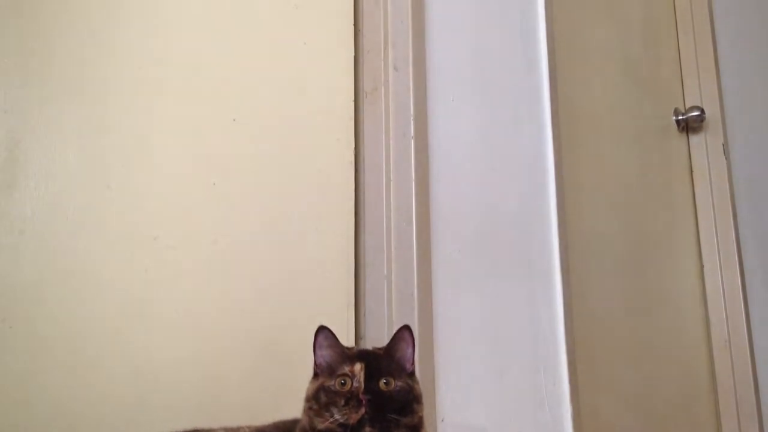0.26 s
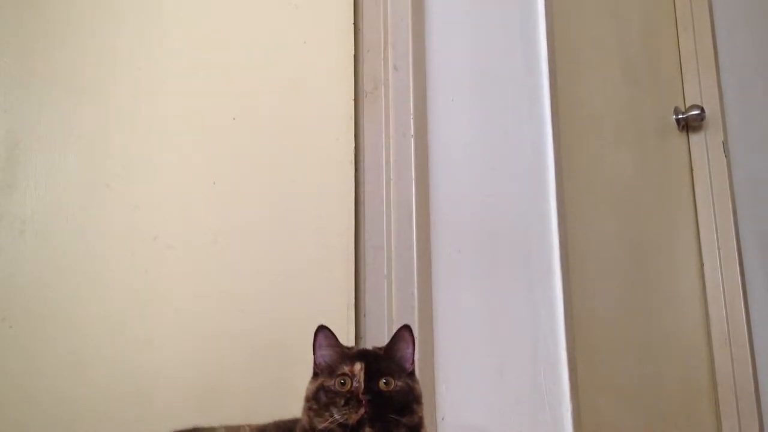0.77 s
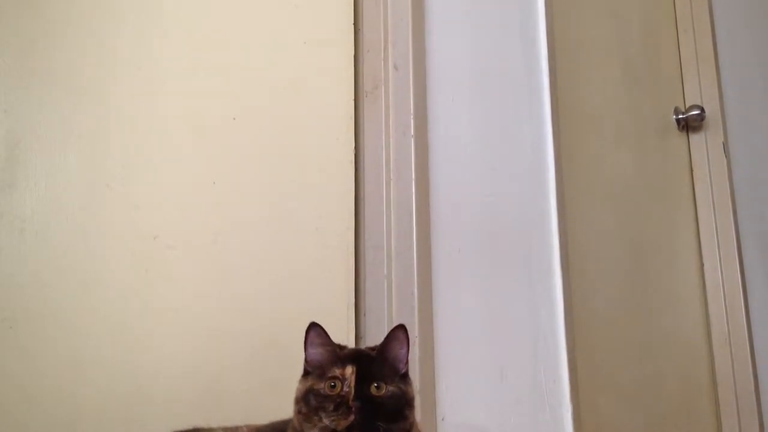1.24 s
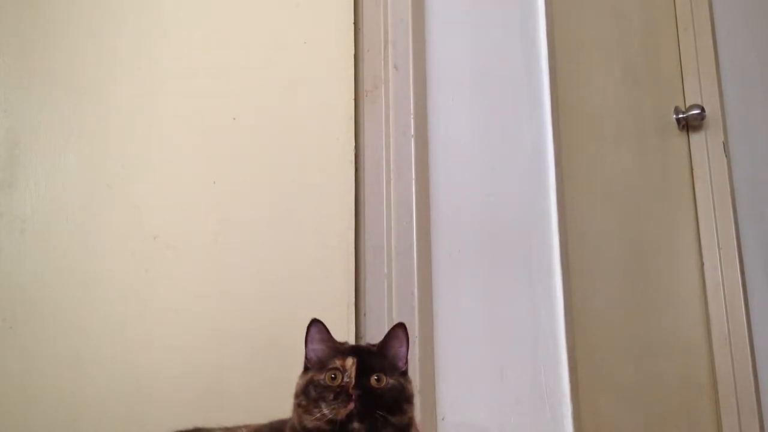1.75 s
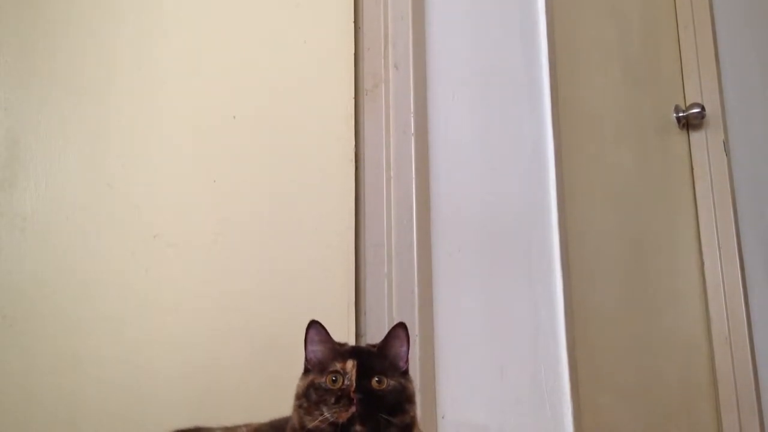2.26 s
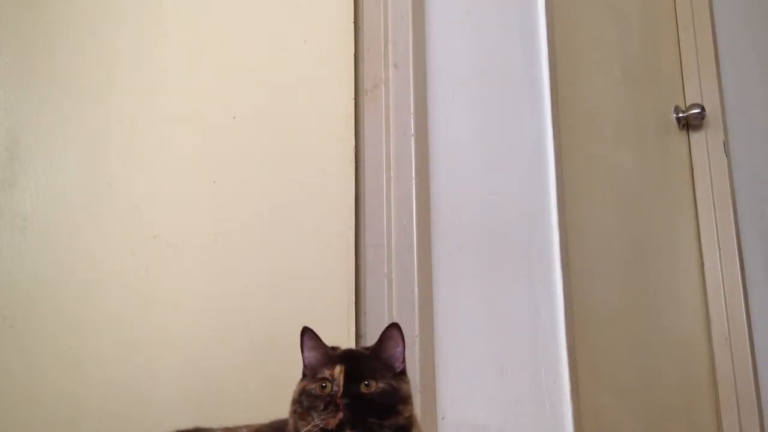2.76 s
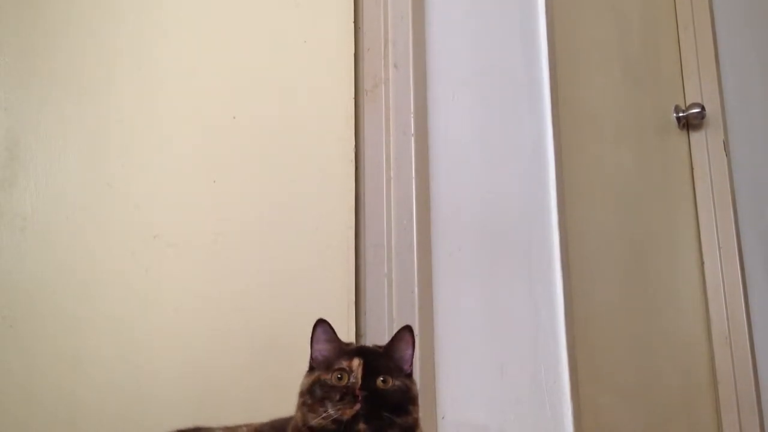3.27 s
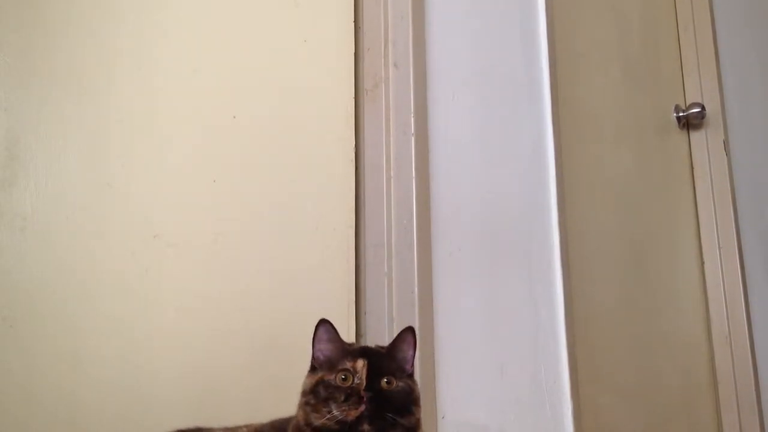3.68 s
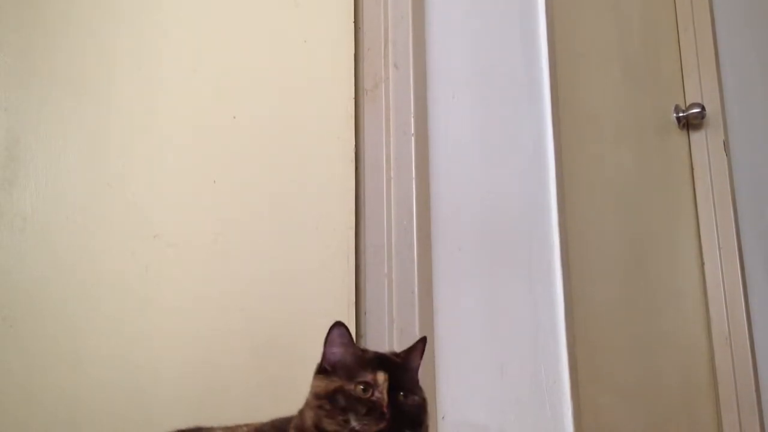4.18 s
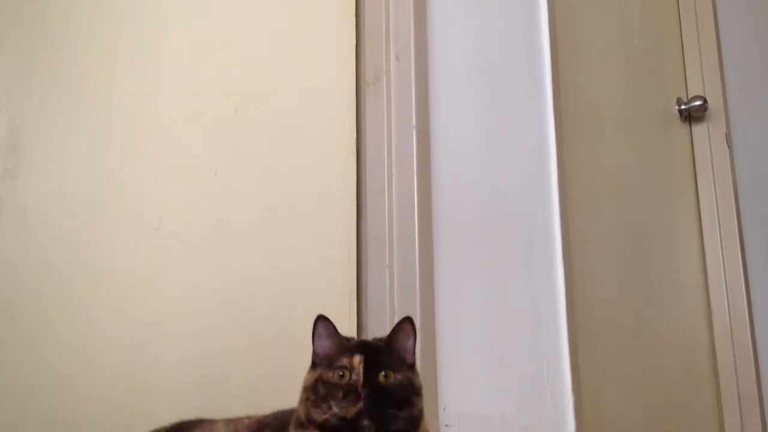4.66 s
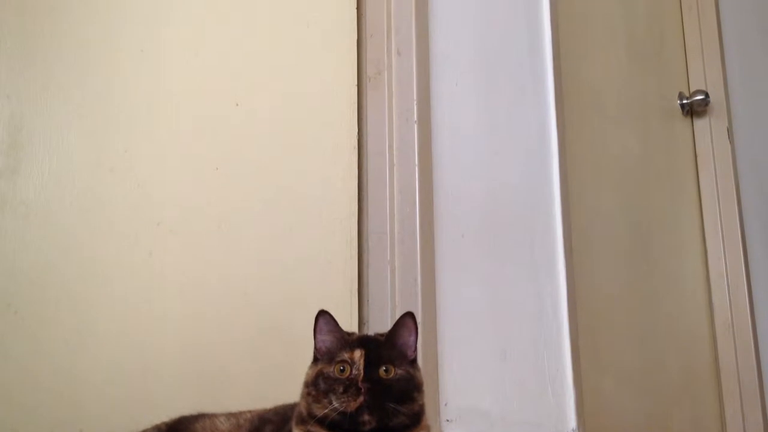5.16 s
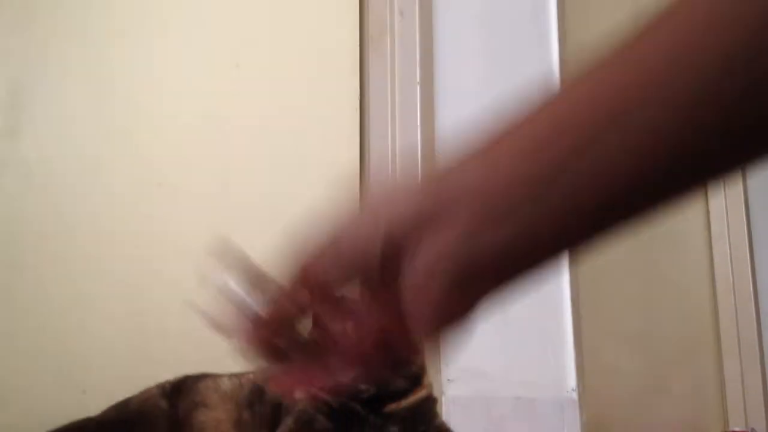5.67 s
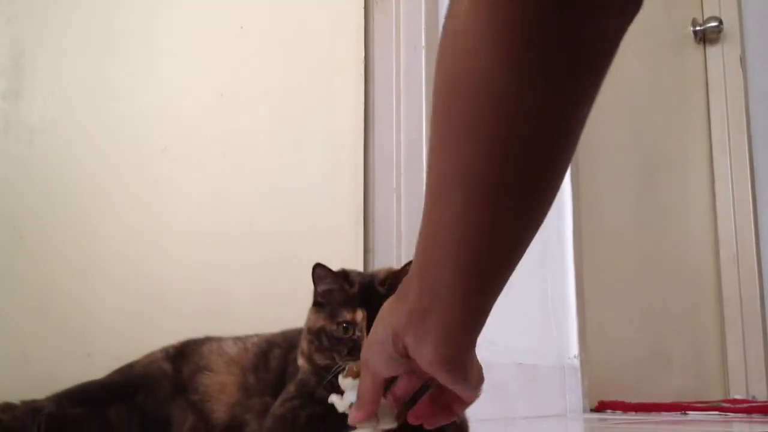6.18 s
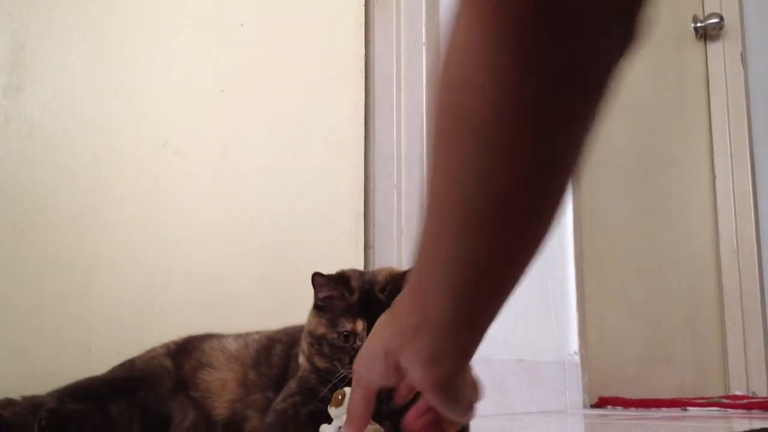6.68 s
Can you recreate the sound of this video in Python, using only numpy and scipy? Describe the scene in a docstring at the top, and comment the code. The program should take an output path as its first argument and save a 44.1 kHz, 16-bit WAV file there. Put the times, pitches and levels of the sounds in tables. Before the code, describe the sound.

Close to a mono microphone in a quiet, hard-walled room, fingers wind a small plastic clockwork toy. Nine ratcheting twists, some nearly joined, make sharp clicks over fine gear ticking, with short bright whirrs between most of them and little finger knocks. Let go at about five seconds, the motor whirrs loudly, grows duller, quieter and slower as it is set down, then speeds up again.

```python
"""A hard, quiet room, rumbling, humming and hissing faintly; a small plastic clockwork toy close to a mono microphone.
From the start it is wound by hand: each twist ticks the gears and snaps the pawl, made of short noise bursts.
Fingers knock and rub on the case; between twists they let go and the gears race, strikes and chatter in a case filter.
After the last twist the motor runs free, its colour passing from lifted to lowered, to the floor, to half tipped up.
Bare walls and floor answer the toy throughout with a short tail of decaying noise."""
import sys
import numpy as np
from scipy import signal
from scipy.fft import rfft, irfft
from scipy.io import wavfile

SR = 44100
rng = np.random.default_rng(int(sys.argv[2]) if len(sys.argv) > 2 else 0)


def generate_wav(signal):
    """Clip the signal to [-1, 1] and save it as 16-bit WAV at the path in sys.argv[1]."""
    frames = np.transpose(np.atleast_2d(signal))
    scaled = np.clip(frames, -1, 1) * 32767
    pcm = np.round(scaled).astype(np.int16)
    wavfile.write(sys.argv[1], SR, pcm)


N = 305613

# rumble of the room: (frequency [Hz], relative level [dB])
ROOM_RUMBLE = [(20, -48), (50, -40), (70, -19), (95, -9), (120, -9.5), (160, -0.5), (250, 2.5), (320, -3),
               (450, -7.5), (700, -9.5), (1000, -13.5), (1500, -20.5), (3000, -33)]
# hum of the room: (frequency [Hz], level [dB])
ROOM_HUM = [(146, -69.5), (232, -74), (340, -72.5), (383, -71)]
# hiss of the room: (frequency [Hz], relative level [dB])
ROOM_HISS = [(500, -1), (1200, 4.5), (2500, 5.5), (6000, -8), (15000, 12)]
# twists of the key: (start [s], end [s], gear ticking before trim [dB], ratchet teeth passing [1/s])
TWISTS = [(0, .31, -46.5, 22), (0.629, 0.816, -44.5, 70), (1.12, 1.28, -45, 65), (1.589, 1.745, -45, 58),
          (2.052, 2.252, -43.5, 56), (2.664, 2.951, -47.5, 36), (3.35, 3.612, -45.5, 37),
          (4.12, 4.58, -47.5, 30), (4.59, 4.72, -47, 25)]
# spectrum of the ticking gears: (frequency [Hz], relative level [dB])
TICK_SPECTRUM = [(150, -33), (700, -10), (1500, -15), (2800, -14.5), (4200, -8.5), (5500, -14), (6700, -7),
                 (7800, -7.5), (10000, -2), (11500, -4), (13000, -3.5), (15200, -1)]
# loudest pawl clicks: (time [s], snap level before trim [dB], dull body relative to the snap before trim [dB])
LOUD_CLICKS = [(0.0145, -36, -4.5), (.0461, -32, -6), (.105, -30.5, -13), (.138, -29.5, -5.5),
               (.162, -31, -9.5), (.1847, -35, -14), (0.1956, -33, -5), (0.2042, -26.5, -20),
               (.2201, -31, -7.5), (0.2311, -31, -2), (.244, -30, -16), (.258, -32.5, -3.5),
               (.271, -33, -16), (.299, -29, -14), (.649, -33.5, -6.5), (.7314, -30.5, -2),
               (.753, -30, -10), (.7649, -29.5, -12), (0.7807, -30, -9), (1.1799, -36, -8),
               (1.193, -29, -8), (1.2183, -31, -4), (1.243, -35.5, 3.5), (1.6556, -28.5, -18),
               (1.6673, -30.5, -4.5), (1.6801, -28.5, -20), (1.691, -37, .5), (2.068, -29.5, -11),
               (2.1377, -33, 0.5), (2.174, -31.5, -2), (2.2053, -31.5, -1), (2.2277, -31.5, -4.5),
               (2.688, -31, -11), (2.714, -30, -18), (2.7471, -30.5, -5), (2.798, -32.5, -3.5),
               (2.8569, -28.5, -7), (2.8732, -28, -10), (2.8894, -33, -4), (2.9293, -31.5, -8),
               (3.37, -30, -14), (3.3984, -30.5, -10), (3.4248, -27.5, -13), (3.4762, -27, -8),
               (3.5008, -26.5, -17), (3.5227, -26.5, -8.5), (3.5444, -30, -9), (3.568, -29, -7.5),
               (4.1398, -36.5, -2.5), (4.1646, -31.5, -7), (4.1914, -32.5, -8), (4.2234, -29, -20),
               (4.2455, -26.5, -6.5), (4.2779, -25.5, -19), (4.3066, -26.5, -10.5), (4.3608, -31, -5),
               (4.3885, -31, -8.5), (4.425, -32, -9), (4.4572, -28, -10.5), (4.502, -26, -12.5),
               (4.5607, -27, -10), (4.644, -29, -10.5), (4.6968, -30, -6), (4.757, -32, -7),
               (4.803, -30.5, -2.5)]
# ring of the pawl tip: (frequency [Hz], relative level [dB])
PAWL_TIP = [(5000, -33), (8000, -13.5), (10000, -10), (11900, -1), (12800, -2), (14000, 3.5), (15200, 1.5),
            (16500, -19)]
# ring of the case under the pawl: (frequency [Hz], relative level [dB])
CASE_UNDER_PAWL = [(80, -40), (300, -19.5), (1500, -9.5), (2900, -9.5), (4200, -1.5), (5900, -2),
                   (6700, 2.5), (7800, -6.5), (10000, -5), (15200, -5), (16500, -24)]
# fingers knocking and rubbing on the case:
# (time [s], level [dB], centre [Hz], width [Hz], decay [s])
HANDLING = [(0.306, -48, 343, 160, 0.0068), (.78, -60, 1100, 600, 0.096), (2.79, -58, 990, 902, 0.044),
            (3.477, -34, 4200, 502, 0.0018), (3.708, -42.5, 2060, 1390, 0.013),
            (3.736, -47.5, 2500, 900, 0.054), (4.421, -39.5, 1350, 1400, 0.0018),
            (4.438, -45, 3300, 2000, 0.0035), (4.503, -46, 320, 239, 0.024),
            (4.538, -59, 2600, 1800, 0.0022), (4.685, -45, 1770, 1600, 0.0022),
            (4.77, -57.5, 1270, 200, 0.054), (4.768, -62, 2700, 1200, .025), (4.803, -55.5, 890, 800, 0.03),
            (4.989, -37.5, 1700, 1400, 0.0036), (6.719, -31.5, 5060, 2000, .003)]
# motor racing between twists: (start [s], stop [s], middle band before kick and fidget [dB],
# case body relative to it [dB], treble relative to it [dB], treble lost as the palm passes over [dB],
# hollow of the hand: centre [Hz], width [Hz], gain [dB])
SPINS = [(0.345, 0.614, -36.5, -14, 3.5, -1, 3300, 830, 4),
         (0.852, 1.112, -35.5, -16, 3.5, 1, 6500, 500, 0), (1.336, 1.575, -34.5, -14.5, 5, 1, 3480, 510, 3),
         (1.771, 2.04, -33.5, -14.5, 4.5, .5, 8800, 490, 4),
         (2.316, 2.645, -35.5, -14, 6.5, 1, 8500, 650, -1.5),
         (2.99, 3.341, -34.5, -14.5, 6, .5, 12100, 2500, 0.5),
         (3.686, 4.089, -33, -16, 5, 4.5, 5360, 1218, 2)]
# what the case radiates in the hand: (frequency [Hz], relative level [dB])
IN_HAND = [(500, -31.5), (1350, -26), (1700, -19), (2800, -20), (3300, -13), (4400, -16.5), (5100, -8),
           (7500, -8.5), (8500, 1), (9900, -2.5), (11200, 6), (12600, 4.5), (14200, 1.5), (15300, -3)]
# narrow case resonances while the fingers hold it: (frequency [Hz], width [Hz], gain [dB])
HELD_CASE = [(1700, 94, 3), (3300, 160, 3), (5630, 140, 1.5), (6740, 270, 7.5)]
# motor running free: (time [s], middle band before trim and fidget [dB],
# case body relative to it [dB], treble relative to it [dB])
RUN_LEVELS = [(5.0, -26, -17, 5), (5.106, -30, -15, 4), (5.466, -25.5, -15.5, 2.5), (5.628, -31, -16, 3),
              (5.644, -33, -13.5, 6.5), (5.758, -33, -15.5, -3.5), (5.978, -35, -17, 2),
              (6.204, -40, -16, -5.5), (6.412, -40.5, -17.5, -6.5), (6.526, -38, -14, -4),
              (6.93, -34.5, -16.5, -3)]
# speed of the free run, before wobble: (time [s], teeth passing [Hz])
RUN_SPEED = [(4.94, 1114), (5.5, 1180), (5.9, 1056), (6.05, 855), (6.24, 635), (6.42, 586), (6.49, 721),
             (6.63, 739), (6.93, 952)]
# the way down: (time [s], pose [0 lifted, 1 lowered, 2 on the floor, 3 tipped up again; held within 0-3])
POSE_PATH = [(4.94, 0.53), (5.25, 0), (5.5, -0.24), (5.75, 1), (5.98, 1), (6.45, 2), (6.55, 2.5)]
# what the case radiates when lifted: (frequency [Hz], relative level [dB])
LIFTED = [(500, -30), (1100, -31.5), (1750, -17.5), (2100, -22.5), (3450, -10.5), (4300, -20), (5750, -3),
          (6400, -4), (7600, -5), (8150, 1.5), (9600, -4), (12700, 4.5), (13200, 1), (15300, -6)]
# what the case radiates when lowered: (frequency [Hz], relative level [dB])
LOWERED = [(500, -31), (1400, -26), (2100, -14), (3600, -18.5), (4600, -13.5), (5300, -6), (6050, -14.5),
           (6650, -1), (7600, -7.5), (8250, 1.5), (9500, -7), (11300, -3), (13200, -5), (14800, -6.5)]
# what the case radiates on the floor: (frequency [Hz], relative level [dB])
ON_FLOOR = [(500, -51), (1500, -30), (2400, -10), (3600, -27), (4300, -17), (4900, -7.5), (5400, -9.5),
            (6050, -21), (6500, -14), (8000, -5), (9150, -1.5), (9700, -14), (11300, -9), (15300, -15)]
# what the case radiates when tipped up again: (frequency [Hz], relative level [dB])
TIPPED = [(500, -23.5), (1400, -24), (2300, -20), (2850, -14.5), (3350, -18.5), (4300, -16), (4900, -5),
          (6400, -1), (7600, -4.5), (8350, 0), (9200, -3), (10000, -17), (11000, -6.5), (15300, -8)]

TOP_HZ = 15350  # upper limit of the microphone chain
T = np.arange(N) / SR
TAPS = 8192  # length of the colouring filters
FREQ = np.arange(TAPS + 1) * SR / (2 * TAPS)
TWIST_RISE_S, TWIST_FALL_S = .04, .027  # the wrist speeds up and slows down
FAINT_DB, FAINT_BODY_DB, FAINT_SCATTER_DB = -38, -4, 3  # clicks of a pawl that barely lifts, before trim
FAINT_JITTER_S = .002  # unevenness of the wrist
SLIP_S, SLIP_SCATTER_DB = .0012, 3.4  # typical time the pawl takes to slide off a tooth, and its scatter
SPIN_UP_S, BRAKE_S = .05, .08  # the gears gather speed; the fingers stop them
JOLT = .19  # share of full level reached at once on release
KICK_DB, KICK_BODY_DB, KICK_S = 2.5, 6, .056  # the jolt of release shakes the case, then settles
RELEASE_S = 4.946  # the key is let go for good
CLEAN_SLOW, CLEAN_FAST = .59, .07  # power share of clean tooth strikes at the lowest and highest speed


def undb(db):
    """Decibels to gain."""
    return 10 ** (np.asarray(db) / 20)


def unit(x):
    """Scale to rms 1."""
    return x / np.sqrt(np.mean(x ** 2))


def noise():
    """White noise for the whole scene."""
    return rng.standard_normal(N)


def curves(rows):
    """Each column of a table as a line through time."""
    s, *columns = np.transpose(rows)
    return [np.interp(T, s, column) for column in columns]


def walk(rate):
    """Random drift through `rate` new values a second, joined by straight lines."""
    knots = rng.standard_normal(4096)
    return np.interp(T * rate, np.arange(len(knots)), knots)


def add(out, s, sound):
    """Lay a sound in at its time."""
    i = max(int(s * SR), 0)
    out[i:i + len(sound)] += sound[:N - i]


def colour(x, points, peaks=()):
    """Minimum-phase filter from a short spectrum and resonances, scaled to power gain 1 for white noise."""
    hz, db = np.transpose(points)
    shape = np.interp(np.log(FREQ + 1), np.log(hz), db)
    for centre, width, lift in peaks:
        shape = shape + lift / (1 + (2 * (FREQ - centre) / width) ** 2)
    gain = undb(shape)
    gain /= np.sqrt(np.mean(gain ** 2 * (FREQ < TOP_HZ)))
    # folding the cepstrum makes the filter causal
    cepstrum = irfft(np.log(gain))
    cepstrum[1:TAPS] *= 2
    cepstrum[TAPS + 1:] = 0
    taps = irfft(np.exp(rfft(cepstrum)))[:TAPS]
    return signal.oaconvolve(x, taps)[:N]


def band(x, hz, width):
    """Band-pass resonance around a centre."""
    low = np.hypot(hz, width / 2) - width / 2
    return signal.sosfilt(signal.butter(2, [low, low + width], "band", fs=SR, output="sos"), x)


def swell(start, stop, rise_s, fall_s, jolt=0):
    """Level jumps to a share of its top, climbs evenly, holds, and falls evenly to silence."""
    rise = np.clip(jolt + (T - start) / rise_s, 0, 1)
    fall = np.clip((stop - T) / fall_s, 0, 1)
    return (T >= start) * rise * fall


def background(rumble_db=-57.5, hiss_db=-62, hum_width_hz=9):
    """Steady rumble, wavering hum from narrow noise bands, and faint hiss of the room."""
    rumble = undb(rumble_db) * colour(noise(), ROOM_RUMBLE)
    hum = sum(undb(db) * unit(band(noise(), hz, hum_width_hz)) for hz, db in ROOM_HUM)
    hiss = undb(hiss_db) * colour(noise(), ROOM_HISS)
    return rumble + hum + hiss


def teeth(hz, ring_s, scatter_db, wobble):
    """Each tooth lands with its own force and gives a tiny dying crack."""
    turns = np.cumsum(hz * (1 + wobble * walk(90))) / SR
    force = undb(scatter_db * noise())[turns.astype(int)]
    since_strike = (turns % 1) / hz
    return unit(force * np.exp(-since_strike / ring_s) * noise())


def winding(gain_db=-6.5, tooth_hz=310):
    """The key turns the gears slowly enough for single teeth to tick."""
    ticks = teeth(tooth_hz * undb(walk(9)), ring_s=.0009, scatter_db=3, wobble=.06)
    turning = np.zeros(N)
    for start, end, db, _ in TWISTS:
        turning += undb(db) * swell(start, end, TWIST_RISE_S, TWIST_FALL_S)
    return undb(gain_db) * colour(ticks, TICK_SPECTRUM) * turning


def faint_clicks():
    """Between the loud clicks the pawl still ticks over the passing teeth, almost evenly but weakly."""
    times = []
    for start, end, _, rate in TWISTS:
        marks = [start] + [s for s, *_ in LOUD_CLICKS if start < s < end] + [end]
        for a, b in zip(marks, marks[1:]):
            times.extend(np.linspace(a, b, round((b - a) * rate) + 1)[1:-1])
    clicks = []
    for s, (early, force, dull) in zip(times, rng.standard_normal((256, 3))):
        snap_db = FAINT_DB + FAINT_SCATTER_DB * force
        dull_db = FAINT_BODY_DB + FAINT_SCATTER_DB * dull
        clicks.append((s + FAINT_JITTER_S * early, snap_db, dull_db))
    return clicks


def pawl(snap_db=-1.85, body_db=-3, snap_s=.00045, body_s=.0017, bounce_s=.0036, bounce_db=-12, spread=.035):
    """The pawl slips off a tooth, snaps on the next, shakes the case and bounces once; each rings at its own pitch."""
    t, out = T[:700], np.zeros(N)
    impulse = 1. * (T == 0)
    rings = [colour(impulse, points)[:len(t)] for points in (PAWL_TIP, CASE_UNDER_PAWL)]
    chance = rng.standard_normal((256, 3))
    grit = rng.standard_normal((256, 2, len(t)))
    clicks = LOUD_CLICKS + faint_clicks()
    for (s, db, dull_db), (hop, slide, tooth), grains in zip(clicks, chance, grit):
        late = bounce_s * undb(1.5 * hop)
        slip_s = SLIP_S * undb(SLIP_SCATTER_DB * slide)
        ring_length = int(len(t) * np.exp(spread * tooth))
        parts = zip(rings, grains, (snap_s, body_s), (snap_db, body_db + dull_db))
        for ring, grain, decay_s, part_db in parts:
            scrape = np.exp(-np.maximum(t - slip_s, 0) / decay_s) * grain
            click = signal.fftconvolve(scrape, signal.resample(ring, ring_length))
            # its whole energy, counted over 3 ms, sets the rms level
            click *= undb(db + part_db) * np.sqrt(.003 * SR) / np.linalg.norm(click)
            add(out, s, click)
            add(out, s + late, undb(bounce_db) * click)
    return out


def room(x, wet_db=-12, t60=.23, gap_s=.0041, sway_hz=1.3):
    """Bare walls and floor answer with a short bright tail, which changes as the hand sways."""
    t = T[:SR // 2]
    decay = np.exp(-np.log(1000) * t / t60)
    onset = np.clip(2 * t / gap_s - 1, 0, 1)  # silent for half the gap, full at its end
    tails = rng.standard_normal((2, len(t))) * decay * onset
    tails = signal.sosfilt(signal.butter(1, 12000, fs=SR, output="sos"), tails)
    here, there = (signal.fftconvolve(x, tail / np.linalg.norm(tail))[:N] for tail in tails)
    angle = 2 * np.pi * sway_hz * T
    return x + undb(wet_db) * (np.cos(angle) * here + np.sin(angle) * there)


def handling():
    """Small knocks and rubs of the fingers: noise bursts that die away in one resonance."""
    out, t = np.zeros(N), T[:SR // 2]
    for s, db, hz, width, decay in HANDLING:
        fade = np.exp(-t / decay)
        knock = band(fade * rng.standard_normal(len(t)), hz, width)
        # the same energy whatever the resonance
        knock *= np.linalg.norm(fade) / np.linalg.norm(knock)
        add(out, s, undb(db) * knock)
    return out


def echo(x, lag_s, share):
    """Add a reflection whose path may change; the level stays about the same."""
    reflection = np.interp(np.arange(N) - lag_s * SR, np.arange(N), x)
    return (x + share * reflection) / np.hypot(1, share)


def gears(hz, clean, impacts=12000, scatter_db=1.5, flutter_db=1.06):
    """A racing gear train: regular tooth strikes amid the loose chatter of wheels in their bearings."""
    hits = rng.random(N) < impacts / SR  # impacts a second, at random
    chatter = hits * np.sign(noise()) * undb(scatter_db * noise())
    strikes = teeth(hz, ring_s=.0006, scatter_db=1.2, wobble=.012)
    clean = np.clip(clean, 0, 1)
    drive = np.sqrt(clean) * strikes + np.sqrt(1 - clean) * unit(chatter)
    drive = drive * undb(flutter_db * walk(160))
    # so small a case radiates no bass
    drive = signal.sosfilt(signal.butter(2, 170, "high", fs=SR, output="sos"), drive)
    # palm and forearm reflect it and never keep still, so fine ripples wander through the whirr
    drive = echo(drive, .0015 * undb(1.3 * walk(6)), share=.22)
    return unit(echo(drive, .0045 * undb(.25 * walk(5)), share=.33))


def split(x):
    """Body of the case, middle band and treble, each at rms 1."""
    body = signal.sosfiltfilt(signal.butter(6, 4300, "low", fs=SR, output="sos"), x)
    treble = signal.sosfiltfilt(signal.butter(6, 9800, "high", fs=SR, output="sos"), x)
    return np.array([unit(body), unit(x - body - treble), unit(treble)])


def shade(parts, db, body_db, treble_db, fidget_db=.6, fidget_hz=26):
    """Drive sets the level; the restless hand damps the body of the case and covers the treble."""
    out = np.zeros(N)
    for part, rel_db in zip(parts, (body_db, 0, treble_db)):
        out += part * undb(db + rel_db + fidget_db * walk(fidget_hz))
    return out


def spins(mesh_hz=1100):
    """The spring runs away for a moment whenever the fingers change their grip."""
    whirr = colour(gears(mesh_hz, clean=.37), IN_HAND, HELD_CASE)
    out = np.zeros(N)
    for start, stop, db, body_db, treble_db, palm_db, *hollow in SPINS:
        # a flat spectrum, so only the hollow of the hand colours it
        held = split(colour(whirr, [(20, 0), (20000, 0)], [hollow]))
        age = np.clip(T - start, 0, stop - start)
        kick = np.exp(-age / KICK_S)
        palm = np.sin(np.pi * age / (stop - start)) ** 2
        level_db = db + KICK_DB * kick
        sound = shade(held, level_db, body_db + KICK_BODY_DB * kick, treble_db - palm_db * palm)
        out += swell(start, stop, SPIN_UP_S, BRAKE_S, JOLT) * sound
    return out


def free_run(gain_db=-.4, spin_up_s=.069):
    """The motor whirrs on; its colour shifts on the way down, and the slower it runs the more single teeth rasp."""
    hz, = curves(RUN_SPEED)
    drive = gears(hz, np.interp(hz, [hz.min(), hz.max()], [CLEAN_SLOW, CLEAN_FAST]))
    poses = (LIFTED, LOWERED, ON_FLOOR, TIPPED)
    place = np.clip(curves(POSE_PATH)[0], 0, len(poses) - 1)
    parts = np.zeros((3, N))
    for k, pose in enumerate(poses):
        nearness = np.clip(1 - abs(place - k), 0, 1)
        parts += nearness * split(colour(drive, pose))
    running = swell(RELEASE_S, np.inf, spin_up_s, BRAKE_S, JOLT / 2)  # never braked
    return undb(gain_db) * running * shade(parts, *curves(RUN_LEVELS))


def scene():
    """The toy in its room, the same in both channels."""
    toy = winding() + pawl() + handling() + spins() + free_run()
    mono = room(toy) + background()
    return np.array([mono, mono])


def record(dry):
    """The recorder cuts the top steeply."""
    return signal.sosfilt(signal.ellip(10, .2, 70, TOP_HZ, fs=SR, output="sos"), dry)


dry = scene()
out = record(dry)
generate_wav(out)
```